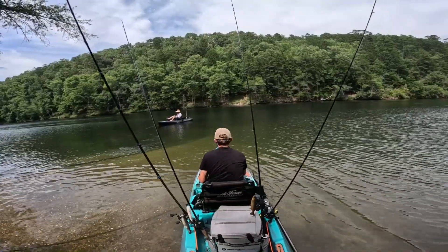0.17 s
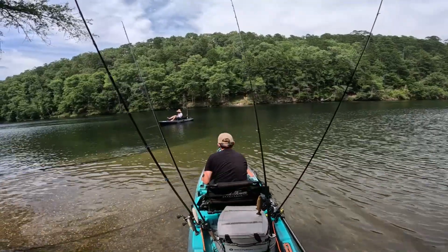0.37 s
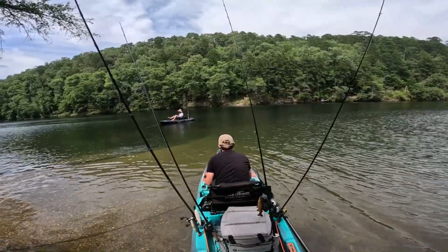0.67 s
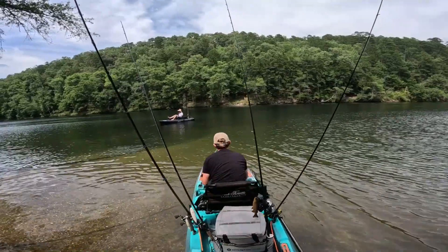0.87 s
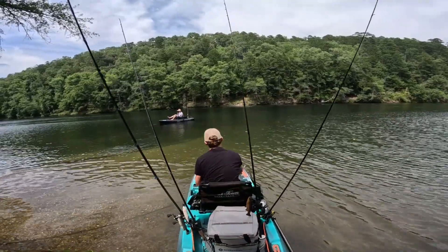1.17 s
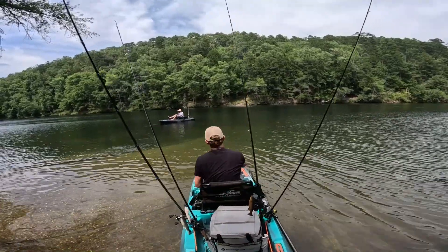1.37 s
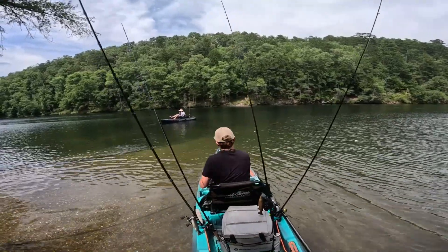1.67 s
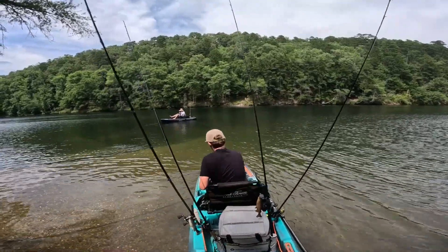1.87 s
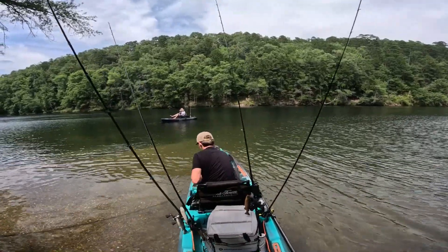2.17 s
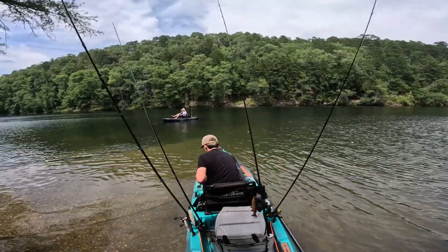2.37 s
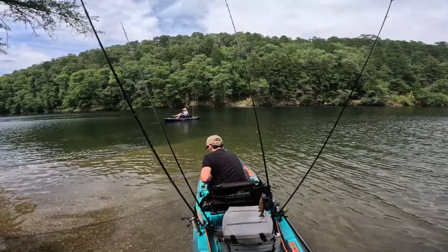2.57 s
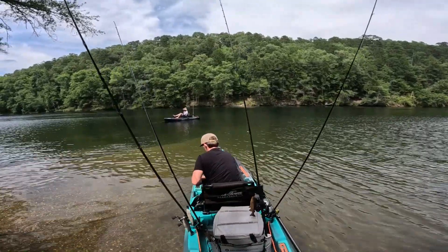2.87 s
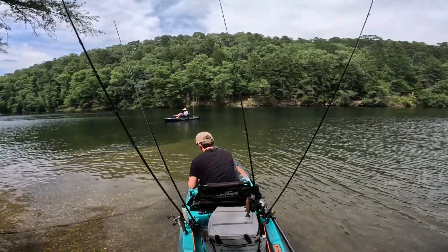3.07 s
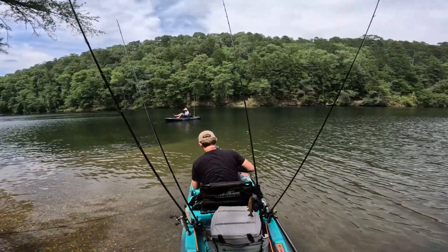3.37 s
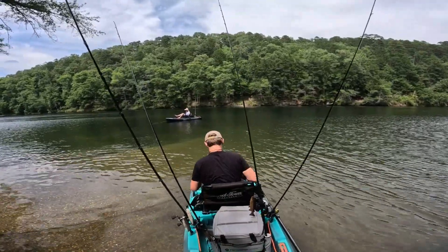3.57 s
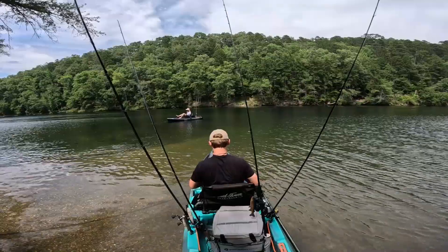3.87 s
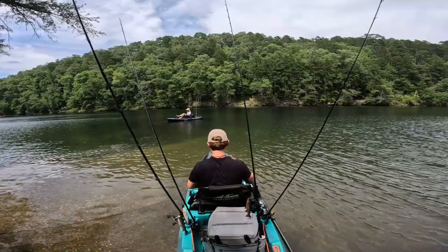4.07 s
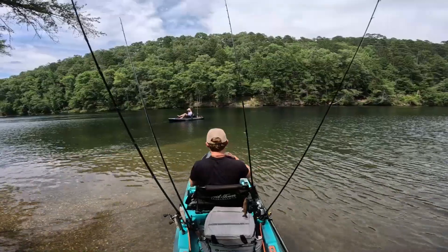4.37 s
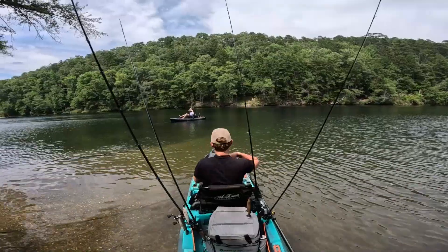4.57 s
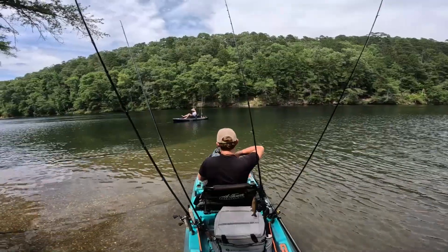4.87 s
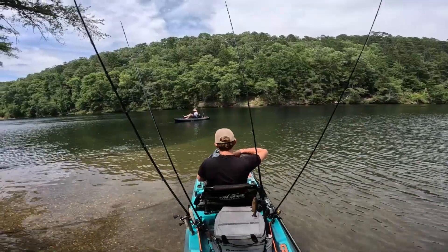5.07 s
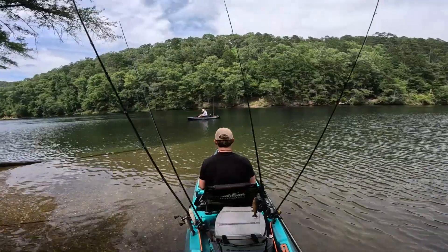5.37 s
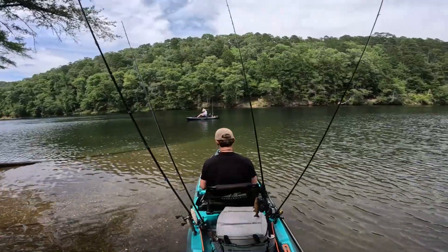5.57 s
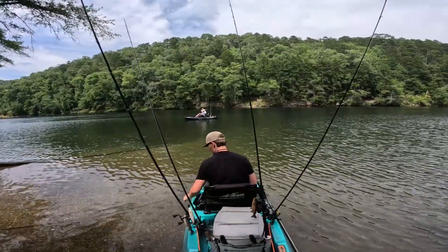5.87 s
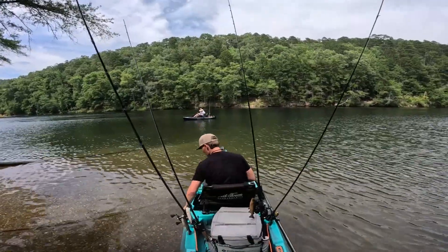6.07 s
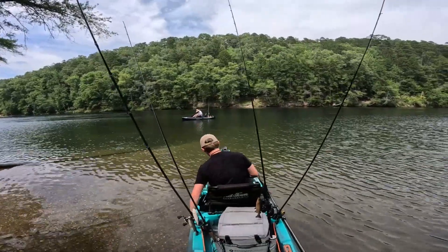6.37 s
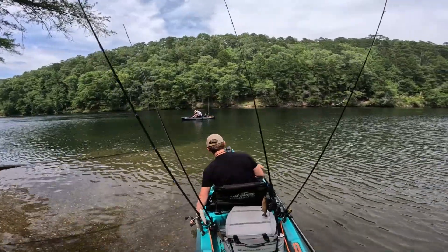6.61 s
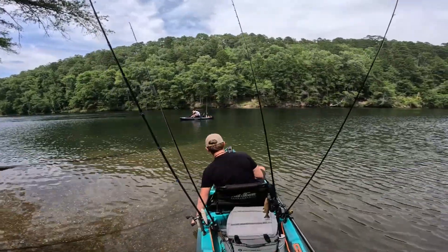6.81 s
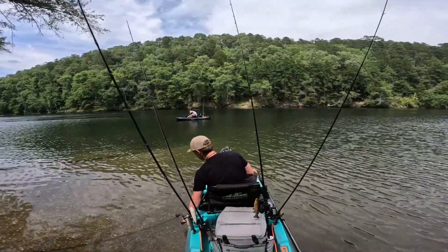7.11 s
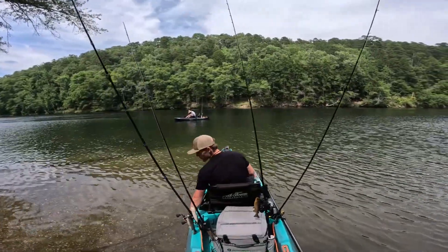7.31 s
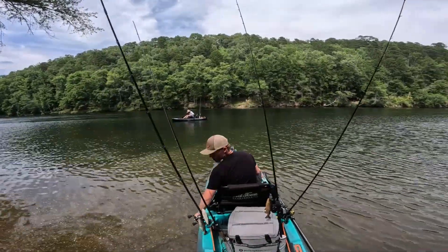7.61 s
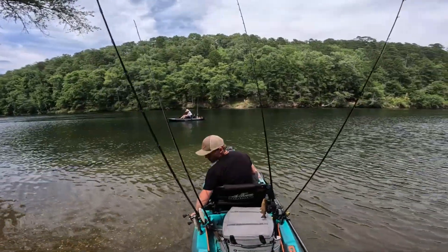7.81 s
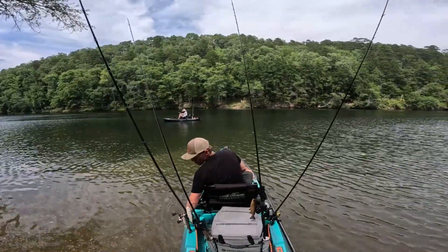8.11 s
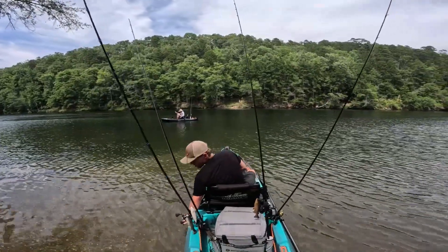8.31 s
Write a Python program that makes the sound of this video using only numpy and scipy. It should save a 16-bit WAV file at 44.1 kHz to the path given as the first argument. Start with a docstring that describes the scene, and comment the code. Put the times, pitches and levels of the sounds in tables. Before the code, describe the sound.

Heard from on board, a kayak's plastic shell shudders and scrapes over gravel at the edge of a lake. A loud shove comes early, a lighter one follows, and after a lull a longer stretch of grinding and knocking stones arrives near the end. Water gurgles and fizzes through the gravel, and a low rumble runs underneath. Far away, insects hiss and birds whistle very faintly.

```python
"""A plastic kayak's hull rumbles and shudders on a pebbly lake shore as the paddler shifts about.
Heard from the hull: shoves grind it over pebbles and grit, which tap its modes; single stones crack
and knock, soft blows thump. Slopping water rings as bubbles and fizzes through the gravel.
Far off the woods hiss with insects, birds whistle and a cricket trills. One tick sounds; a thin buzz sets in."""
import sys
import numpy as np
from scipy import signal
from scipy.fft import rfft, irfft
from scipy.io import wavfile

SR = 44100
rng = np.random.default_rng(int(sys.argv[2]) if len(sys.argv) > 2 else 0)


def store_pcm(level_fs):
    """Save levels as 16-bit WAV."""
    pcm = np.round(np.clip(level_fs, -1, 1) * 32767).astype(np.int16)
    wavfile.write(sys.argv[1], SR, np.atleast_2d(pcm).T)


N = 372644

# hull modes, low to high: (frequency [Hz], gain [dB], t60 [s])
HULL_MODES = [(204.9, 6.5, 0.33), (243, 4, 0.028), (339, 3, 0.02), (462, -8.5, 0.035), (570, -4, 0.019),
              (790, -8, 0.0084), (1065, -11, 0.0081), (1355, -12, 0.0057)]
# resonances of a stone's crack, low to high: (frequency [Hz], gain [dB], t60 [s])
CRACK_MODES = [(1658, 3, 0.0059), (2350, 12, 0.0021), (2700, -3, 0.0028), (3500, -5.5, 0.0031),
               (4900, -7, 0.0019)]
# spectrum of grit and of water in gravel: (frequency [Hz], relative density [dB])
GRIT_SPECTRUM = [(700, -10), (1200, -5), (2460, 1.5), (4100, -4), (6300, -12.5), (9000, -22.5),
                 (15500, -72)]


def from_db(db):
    """Decibels to gain."""
    return 10 ** (np.asarray(db) / 20)


def rms_one(x):
    """Scale to rms 1."""
    return x / np.sqrt(np.mean(x ** 2) + 1e-20)


def drift(corner_hz):
    """Slow random wander, rms about 1."""
    r = np.exp(-80 * np.pi * corner_hz / SR)   # double pole at SR / 40
    slow = signal.lfilter([1], [1, -2 * r, r * r], rng.standard_normal(N // 40 + 2002))[2000:]
    return np.interp(np.arange(N) / 40, np.arange(len(slow)), rms_one(slow))


def coloured(x, spectrum):
    """Shape x by a (Hz, dB) spectrum; rms 1."""
    hz, db = np.transpose(spectrum)
    grid_hz = np.arange(N // 2 + 1) * SR / N + 1
    return rms_one(irfft(rfft(x) * from_db(np.interp(np.log(grid_hz), np.log(hz), db)), N))


def lowpass(x, hz):
    """Fourth-order low-pass."""
    return signal.sosfilt(signal.butter(4, hz, fs=SR, output="sos"), x)


def ring(clicks, hz, t60_s):
    """Resonator: a unit click starts a decaying sine of height 1."""
    r, w = from_db(-60 / (t60_s * SR)), 2 * np.pi * hz / SR
    return signal.lfilter([0, np.sin(w)], [1, -2 * r * np.cos(w), r * r], clicks + 1e-18)


def grains(per_s, spread_db):
    """Random clicks of unequal size and either sign."""
    sizes = from_db(spread_db * np.minimum(rng.exponential(1, N), 5)) * rng.choice([-1, 1], N)
    return sizes * (rng.random(N) < per_s / SR)


def hull_motion():
    """Gains of rumble, shudder, grinding and grit: rocking and shoves add in power."""
    # hull rocking on the shore: (time [s], rumble [dB], scrape [dB])
    rocking = [(0.0, -32, -59.5), (0.23, -44.5, -63), (0.55, -43, -51), (0.92, -39, -75), (1.25, -39, -57),
               (1.46, -52, -42.5), (2.1, -36.5, -56.5), (2.57, -49, -67.5), (2.94, -40, -61),
               (3.48, -43, -70), (4.31, -40, -69), (4.78, -48.5, -76.5), (5.2, -37, -73.5),
               (5.88, -39, -83), (6.43, -40.5, -45), (7.6, -43.5, -54), (8.07, -40, -61), (8.3, -48, -45.5),
               (8.45, -39, -44)]
    # shoves: (time [s], hold [s], fade [dB/s], rumble [dB], shudder [dB], grinding [dB], grit [dB])
    shoves = [(1.504, 0.19, 202, -35, -27.5, -40.5, -56), (1.62, 0.0053, 54.5, -14.5, -22, -33.5, -38),
              (3.522, 0.038, 88, -52, -42, -42.5, -87), (3.615, 0.32, 150, -57, -50, -44, -54.5),
              (3.872, 0.04, 139, -23, -30, -35, -44.5), (3.942, 0.18, 123, -31.5, -36, -67, -85),
              (5.25, 0.041, 5.5, -40, -37, -51.5, -77), (5.552, 0.029, 148, -50, -38.5, -49, -67.5),
              (5.757, 0.059, 84, -42, -26.5, -51.5, -92), (6.073, 0.02, 204, -57, -27, -40.5, -52.5),
              (6.463, 0.39, 56, -45, -28, -32.5, -53.5), (6.96, 0.5, 112, -27, -32, -36.5, -55)]
    t, attack_s = np.arange(N) / SR, .022
    knots_s, *curves_db = np.transpose(rocking)
    rumble_db, scrape_db = [np.interp(t, knots_s, curve) for curve in curves_db]
    shudder_db = 0.57 * rumble_db + 0.43 * scrape_db + 6.5
    grit_db = 0.8 * scrape_db - 23.5
    power = from_db([rumble_db, shudder_db, scrape_db, grit_db]) ** 2
    for at_s, hold_s, fade_db_per_s, *levels_db in shoves:
        swell = np.clip((t - at_s) / attack_s, 0, 1)
        fade = from_db(-fade_db_per_s * np.maximum(t - at_s - attack_s - hold_s, 0))
        power += (from_db(levels_db)[:, None] * swell * fade) ** 2
    return np.sqrt(power)


def rumble():
    """Deep noise of the moving hull."""
    # (frequency [Hz], relative density [dB])
    spectrum = [(12, -33.5), (20, 8.5), (43, 1.5), (120, -7.5), (160, -15.5), (260, -120)]
    return coloured(rng.standard_normal(N), spectrum)


def shudder():
    """The shell shakes: low noise with a fluttering level."""
    # (frequency [Hz], relative density [dB])
    spectrum = [(60, 15), (100, 11.5), (150, 14.5), (200, 10), (300, -1.5), (500, -16), (1500, -100)]
    return from_db(drift(21)) * coloured(rng.standard_normal(N), spectrum)


def grinding():
    """Pebbles roll under the shell; each soft tap rings one hull mode."""
    waver = from_db(1.1 * drift(15))
    taps = grains(per_s=1800, spread_db=3.5)
    mode = rng.integers(0, len(HULL_MODES), N)
    rings = sum(from_db(db) * ring(taps * (mode == k), hz, t60_s)
                for k, (hz, db, t60_s) in enumerate(HULL_MODES))
    soft_contact = signal.butter(2, [300, 1800], "band", fs=SR, output="sos")
    return waver * rms_one(signal.sosfilt(soft_contact, rings))


def grit():
    """Sand crushed under the keel: dense fine clicks in clumps."""
    clumps = from_db(5.1 * drift(61))
    return rms_one(clumps * coloured(grains(per_s=2500, spread_db=2), GRIT_SPECTRUM))


def rasp():
    """Coarse sand drags along the keel, tapping the upper hull modes and the lowest stone mode."""
    taps = grains(per_s=900, spread_db=2) * from_db(4.4 * drift(32))
    rings = sum(ring(taps, hz, t60_s) for hz, _, t60_s in HULL_MODES[5:] + CRACK_MODES[:1])
    return rms_one(lowpass(rings, hz=2220))


def gurgle(per_s, low_hz, high_hz, t60_cycles):
    """Random bubbles ring at 14 pitches, the low ones louder and longer."""
    births = grains(per_s, spread_db=2.5)
    pitch = rng.integers(0, 14, N)
    rings = sum(ring(births * (pitch == k), hz, t60_cycles / hz) * low_hz / hz
                for k, hz in enumerate(np.geomspace(low_hz, high_hz, 14)))
    return rms_one(lowpass(rings, hz=1.17 * high_hz))


def wash(grit_gain, lag_s=0.1):
    """Water fizzes through the gravel: smooth hiss that lags the grit."""
    r = np.exp(-1 / (lag_s * SR))
    lagged_gain = np.sqrt(signal.lfilter([1 - r], [1, -r], grit_gain ** 2))
    hiss = coloured(rng.standard_normal(N), GRIT_SPECTRUM)
    return from_db(-11.5 + 0.68 * drift(16)) * lagged_gain * hiss


def woods():
    """Far insects merge into a hiss."""
    # (frequency [Hz], relative density [dB])
    spectrum = [(250, -22), (500, -16), (900, -45.5), (1200, -15.5), (2000, -17), (3060, -6.5), (3740, -8),
                (7600, -24.5), (12000, -36.5), (15500, -63)]
    return from_db(-68 + drift(8.5)) * coloured(rng.standard_normal(N), spectrum)


def strike(at_s, level_db, modes, contact_s, skid_db, skid_s=.022):
    """Ragged contacts, a swelling bite and a longer skid, drive each mode with a random strength."""
    out, span = np.zeros(N), 5000
    t = np.arange(span) / SR
    bite = (t / contact_s * np.exp(1 - t / contact_s)) ** 3
    skid = from_db(skid_db) * np.tanh(t / contact_s) ** 2 * np.exp(-t / skid_s)
    contacts = rng.standard_normal((len(at_s), span)) * (bite + skid) / np.linalg.norm(bite + skid)
    index = np.minimum(np.round(at_s * SR).astype(int)[:, None] + np.arange(span), N - 1).ravel()
    for hz, db, t60_s in modes:
        strength = from_db(level_db + db + rng.normal(0, 3, len(at_s)))
        force = np.bincount(index, (contacts * strength[:, None]).ravel(), N)
        out += ring(force, hz, t60_s)
    return out


def stones(grit_gain):
    """Stones hit the hull with a crack, a knock and a bright snap; small random ones scale with the grit."""
    # hits, before each part's trim: (time [s], crack [dB], knock re crack [dB], snap re crack [dB])
    hits = [(0.1092, -63.5, 29.5, -23), (0.1308, -61.5, 29, -21), (0.3688, -53.5, 17, -24),
            (0.513, -40.5, -8, -10), (0.6051, -45, 10, -32), (0.9876, -38.5, -8, -18),
            (1.2183, -43, -24, -9.5), (1.2972, -51, 15, -22), (1.3684, -40, 5, -8),
            (1.4367, -30.5, -5, -16), (1.5, -37, 13, -41), (1.614, -34, 12.5, -11), (1.6348, -24.5, 9, -45),
            (1.6658, -24.5, 9, 3), (1.696, -19.5, -1, -4), (1.713, -22, 4, -14), (1.7351, -26.5, 6, 1.5),
            (1.7621, -29, 6, 3.5), (1.78, -20, -5, -9.5), (1.8474, -27.5, 7, -11), (1.892, -24, -3, -14.5),
            (2.017, -31.5, -23, -3.5), (2.1294, -33, -1, -12), (2.2671, -43, 11.5, -8),
            (2.4915, -44.5, 0, -14), (2.7599, -54, 11.5, -3), (3.215, -37, 4.5, -21),
            (3.2642, -35.5, -1.5, -12.5), (3.5373, -48, 11.5, -28), (3.6059, -35.5, 14, -22),
            (3.63, -28, 9.5, -27), (3.675, -42, 16, -34), (3.7488, -33.5, 5.5, -31), (3.831, -32, -14, -29),
            (3.845, -36, 4, -26), (3.898, -34.5, 10.5, -20), (3.93, -38, 1, -1), (3.952, -28.5, 7, -4),
            (3.9834, -32.5, 2.5, 0), (4.03, -35.5, 9.5, -1.5), (4.056, -27.5, -3, -8.5),
            (4.097, -28, -5.5, -11), (4.158, -30, -3.5, -18), (5.7223, -43, 12, -33),
            (5.779, -44, 2.5, -29), (6.076, -30, -4.5, -29), (6.091, -27, 3, -23), (6.447, -34.5, 0, -18),
            (6.495, -15, 4.5, -24), (6.5178, -24, -16, -7), (6.561, -22, -3, -16), (6.5826, -31.5, -10, -4),
            (6.616, -40, 14, 2), (6.679, -30, -4, -8.5), (6.8266, -23.5, 5, -41), (6.9564, -22, 1, -28),
            (6.999, -31, -0.5, -23), (7.062, -38, -7, -24), (7.0864, -19.5, 3.5, -28),
            (7.155, -21, 3.5, -40), (7.181, -42.5, 19.5, -3), (7.215, -26, 2, -9), (7.2939, -16, 3.5, -51),
            (7.377, -14.5, 4.5, -30), (7.449, -18, -4, -51), (7.469, -28.5, 6.5, -39),
            (7.5726, -41.5, 9, -43), (7.8346, -43, 12.5, -23), (8.158, -34.5, -12, -34),
            (8.2858, -35.5, 5, -20.5)]
    # resonances of the snap: (frequency [Hz], gain [dB], t60 [s])
    snap_modes = [(6100, 7, 0.0026), (7800, -7, 0.003), (10000, -11, 0.003)]
    hit_s, hit_db, knock_re_db, snap_re_db = np.transpose(hits)
    small_count, small_per_s, lead_s = 200, 24, .004
    scatter_db = rng.normal(2, 3, (small_count, 3))
    small_s = np.cumsum(rng.exponential(1 / small_per_s, small_count)) % (N / SR)
    small_db = 20 * np.log10(grit_gain[(small_s * SR).astype(int)])[:, None] + scatter_db
    at_s = np.maximum(np.r_[hit_s, small_s] - lead_s, 0)   # contact swells ahead of the blow
    crack_db = np.r_[hit_db, small_db[:, 0]] - 7.5
    knock_db = np.r_[hit_db + knock_re_db, small_db[:, 1]] + 2
    snap_db = np.r_[hit_db + snap_re_db, small_db[:, 2] - 10] + 1.5
    crack = strike(at_s, crack_db, CRACK_MODES, contact_s=0.0055, skid_db=-4.5)
    knock = strike(at_s, knock_db, HULL_MODES[2:], contact_s=0.0067, skid_db=5.5)
    snap = strike(at_s, snap_db, snap_modes, contact_s=0.0041, skid_db=-4)
    soft_snap = signal.lfilter([.5, .5], [1], snap)
    return lowpass(crack, hz=5740) + lowpass(knock, hz=1750) + soft_snap


def birds(echo_s=.07, echo_db=-2):
    """Near-sine glides with fading echoes from the wooded slope."""
    # (start [s], end [s], start pitch [Hz], end pitch [Hz], relative level [dB])
    whistles = [(0.2, 0.252, 3000, 3600, -60), (0.248, 0.31, 3610, 2430, -58),
                (0.42, 0.464, 3000, 2920, -58), (2.076, 2.128, 3120, 2580, -48),
                (3.065, 3.114, 2930, 3680, -57), (2.997, 3.02, 3500, 4100, -60),
                (3.227, 3.263, 2750, 2190, -51), (3.268, 3.417, 2780, 2660, -65),
                (4.55, 4.586, 3300, 2460, -58), (4.589, 4.631, 2760, 3500, -59),
                (4.9, 4.98, 3140, 3220, -66), (5.036, 5.103, 3500, 2090, -60),
                (5.117, 5.144, 2400, 2740, -56), (5.135, 5.218, 2700, 2740, -65.5),
                (5.34, 5.458, 2130, 3500, -54.5), (5.445, 5.485, 2630, 2480, -56.5),
                (5.54, 5.61, 4900, 2580, -58), (5.728, 5.797, 3330, 3340, -56),
                (5.995, 6.05, 3980, 2450, -58), (7.53, 7.58, 2900, 3840, -58),
                (8.047, 8.098, 2540, 2820, -57), (8.19, 8.266, 2140, 2900, -52)]
    calls, waver = np.zeros(N), 1 + .012 * drift(30)
    for start_s, end_s, start_hz, end_hz, db in whistles:
        first, n = round(start_s * SR), round((end_s - start_s) * SR)
        pitch_hz = np.linspace(start_hz, end_hz, n) * waver[first:][:n]
        glide = np.sin(2 * np.pi * np.cumsum(pitch_hz) / SR)
        calls[first:][:n] += from_db(db) * signal.windows.tukey(n, .5) * glide
    calls *= from_db(4 * drift(60) - 6)
    tail = np.exp(-np.arange(6000) / (echo_s * SR)) * rng.standard_normal(6000)
    return calls + from_db(echo_db) * signal.fftconvolve(calls, tail / np.linalg.norm(tail))[:N]


def bubbles(attack_s=0.0014, t60_cycles=67, rise_per_s=1.2):
    """Slopping water frees single bubbles: sines that climb a little as they die."""
    # (time [s], start pitch [Hz], level [dB])
    births = [(1.392, 1670, -33), (1.55, 570, -28), (1.637, 622, -15), (1.848, 910, -29), (2.77, 600, -43),
              (3.017, 1520, -48), (3.61, 511, -25.5), (3.93, 2210, -33), (5.41, 783, -45), (5.63, 600, -45),
              (5.7, 790, -41), (5.78, 760, -39.5), (5.882, 1630, -48), (6.748, 966, -34.5),
              (7.572, 950, -34), (8.16, 1566, -45)]
    out, t = np.zeros(N + SR), np.arange(SR // 4) / SR
    for at_s, hz, db in births:
        envelope = (1 - np.exp(-t / attack_s)) * from_db(db - 60 * t * hz / t60_cycles)
        out[round(at_s * SR):][:len(t)] += envelope * np.sin(2 * np.pi * hz * t * (1 + rise_per_s * t))
    return out[:N]


def thumps(attack_s=0.0037, t60_s=0.11):
    """Soft blows through the shell, one low ring each."""
    # (time [s], relative level [dB], frequency [Hz])
    blows = [(1.505, -5, 212), (1.639, -5, 177), (3.537, -20.5, 256), (3.879, -13.5, 190), (4.0, -12, 36),
             (4.134, -12, 33.3), (5.573, -13, 161), (6.111, -21.5, 185), (6.498, -12, 250),
             (6.61, -12, 194), (6.69, -10.5, 196), (7.163, -11.5, 472), (7.294, -7, 416), (7.38, -3, 114)]
    out, t = np.zeros(N + SR), np.arange(SR // 2) / SR
    for at_s, db, hz in blows:
        envelope = (1 - np.exp(-t / attack_s)) * from_db(db - 6 - 60 * t / t60_s)
        out[round(at_s * SR):][:len(t)] += envelope * np.sin(2 * np.pi * hz * t)
    return out[:N]


def cricket(start_s=2.312, end_s=2.76, hz=4500, pulses_per_s=11.1, fade_db_per_s=15):
    """One high note, pulsed and fading."""
    t = np.arange(N) / SR
    pulse_phase = (pulses_per_s * (t - start_s) + .04 * drift(8)) % 1
    level_db = -61 - 10 * pulse_phase ** 3 - fade_db_per_s * (t - start_s) + 2.5 * drift(40)
    return (t > start_s) * (t < end_s) * from_db(level_db) * np.sin(2 * np.pi * hz * t)


def tick(at_s=5.2279, level_db=-25, fall_s=.0018):
    """A step that falls back within milliseconds."""
    since_s = np.arange(N) / SR - at_s
    return (since_s > 0) * from_db(level_db) * np.exp(-np.abs(since_s) / fall_s)


def insect_buzz(start_s=5.23, hz=9900, t60_s=.006):
    """Thin high buzz: narrow-band noise that swells and sinks."""
    gain = (np.arange(N) / SR > start_s) * from_db(-90 + 4 * drift(4))
    band = ring(rng.standard_normal(N), hz, t60_s)
    return gain * rms_one(ring(band, hz, t60_s))


def scene():
    """Hull, scrape and water follow the hull's motion; blows and the far woods join them. Mono."""
    rumble_gain, shudder_gain, grinding_gain, grit_gain = hull_motion()
    rasp_gain = from_db(-2) * np.sqrt(grinding_gain * grit_gain)
    gurgle_gain = from_db(-9) * np.minimum(grinding_gain, from_db(-48))   # slops up to a limit
    slosh_gain = from_db(3) * grinding_gain
    hull = rumble_gain * rumble() + shudder_gain * shudder()
    scrape = grinding_gain * grinding() + grit_gain * grit() + rasp_gain * rasp()
    small_bubbles = gurgle_gain * gurgle(per_s=60, low_hz=499, high_hz=2200, t60_cycles=81)
    large_bubbles = slosh_gain * gurgle(per_s=120, low_hz=200.3, high_hz=562, t60_cycles=19.7)
    water = small_bubbles + large_bubbles + bubbles() + wash(grit_gain)
    blows = stones(grit_gain) + thumps()
    wildlife = woods() + cricket() + insect_buzz() + birds()
    return (hull + scrape + water + blows + wildlife + tick())[None]


def record(dry):
    """The input stage rounds the peaks; a steep low-pass cuts the top."""
    ceiling, stop_hz = .7, 16200
    rounded = ceiling * np.tanh(dry / ceiling)
    return signal.sosfilt(signal.cheby2(12, 70, stop_hz, fs=SR, output="sos"), rounded)


dry = scene()
out = record(dry)
store_pcm(out)
```